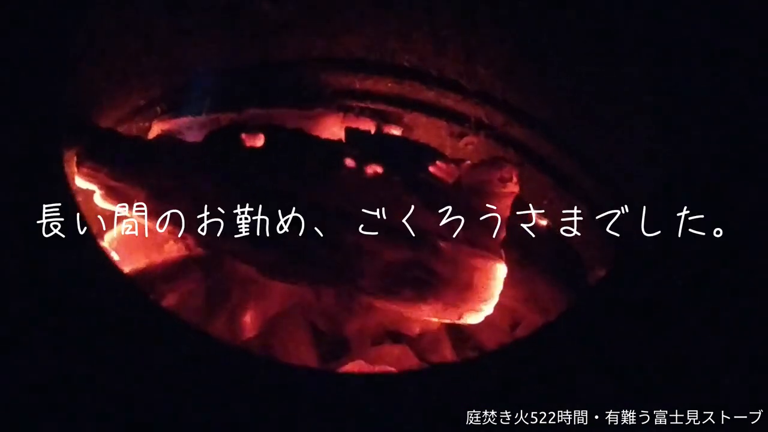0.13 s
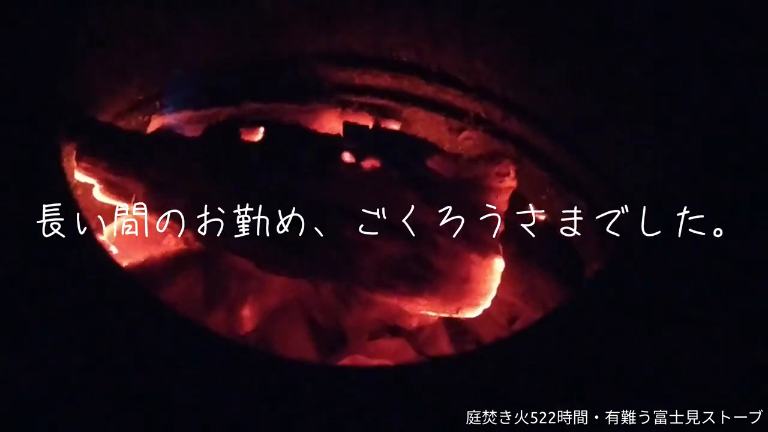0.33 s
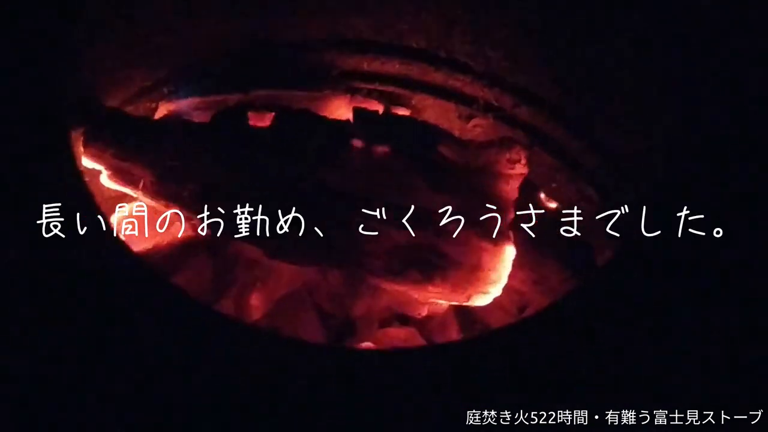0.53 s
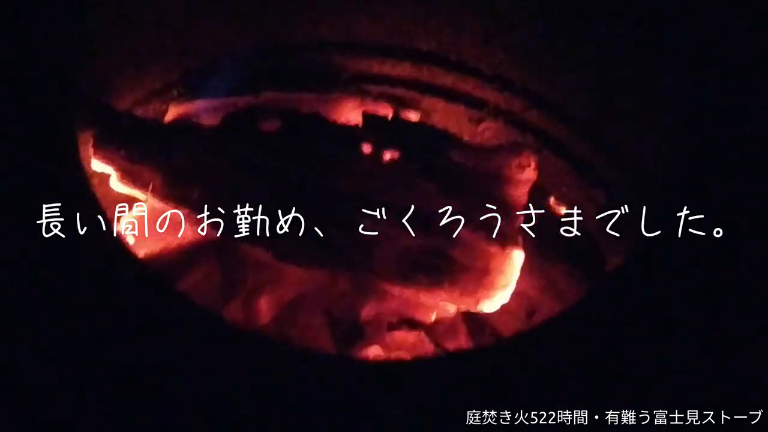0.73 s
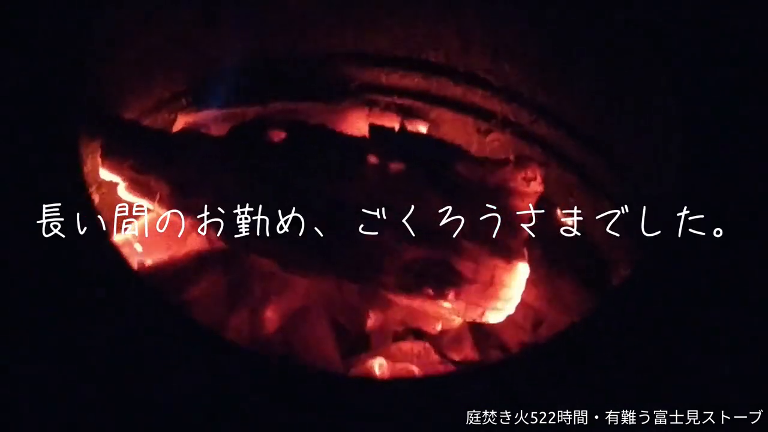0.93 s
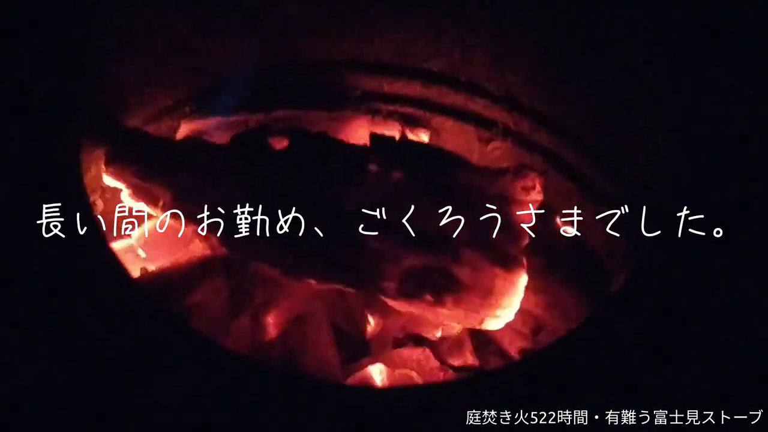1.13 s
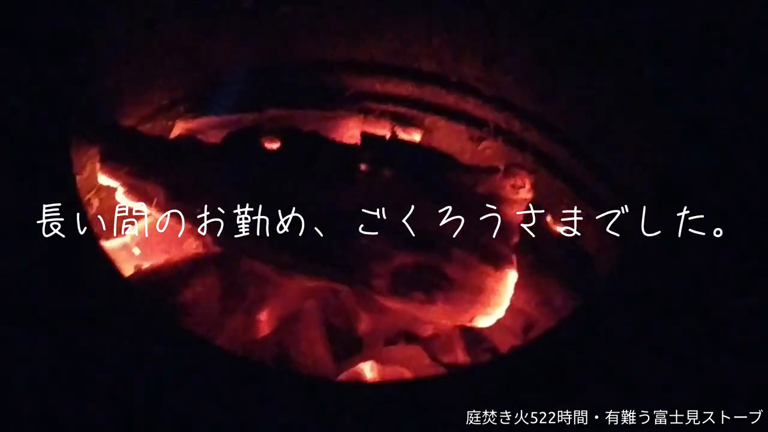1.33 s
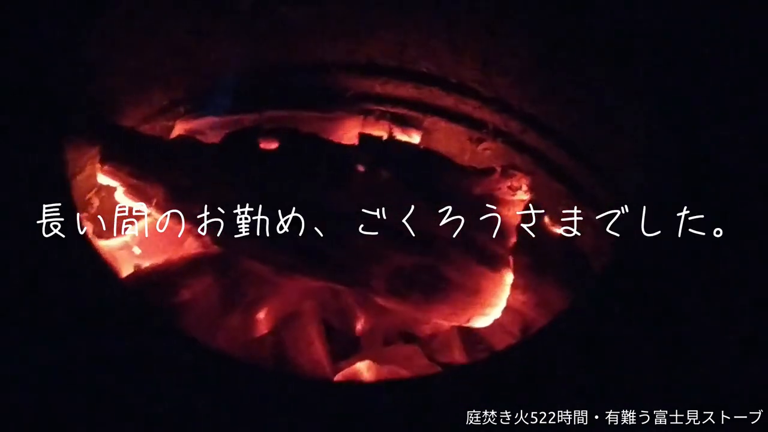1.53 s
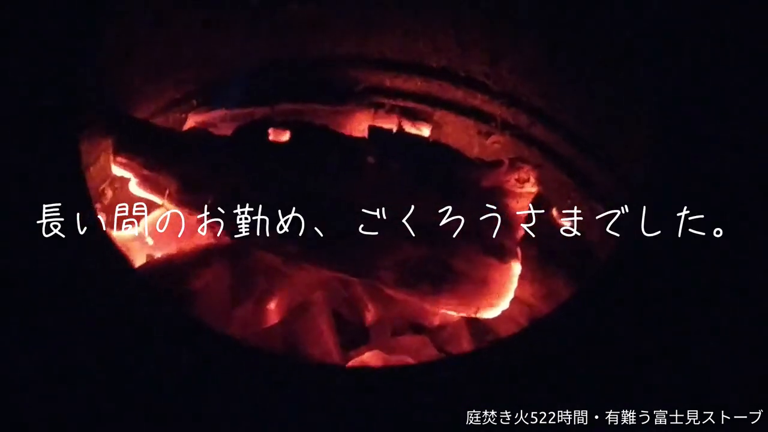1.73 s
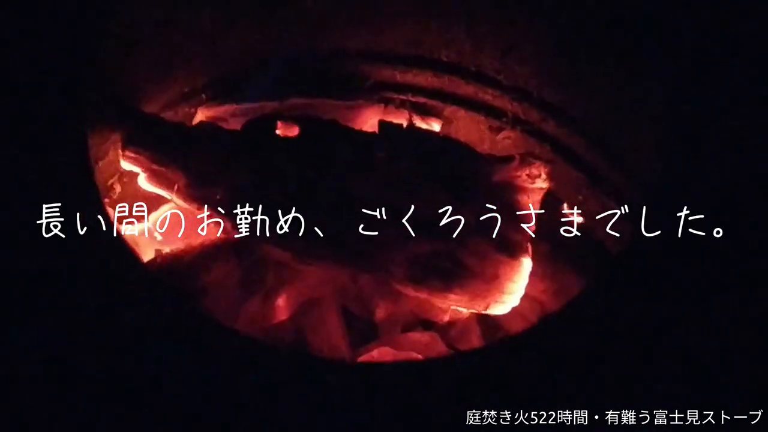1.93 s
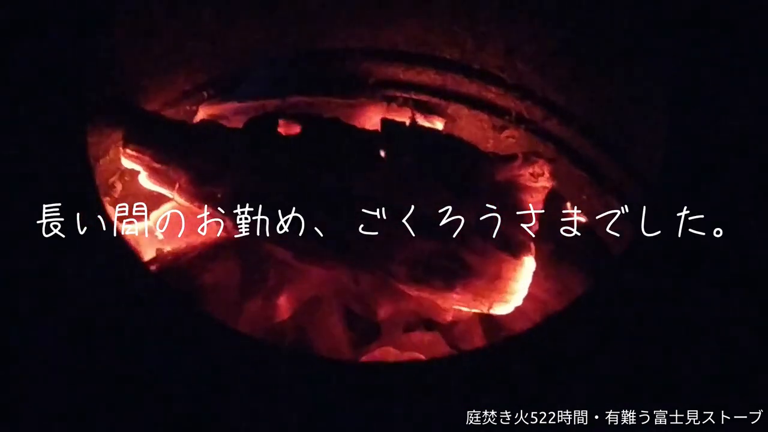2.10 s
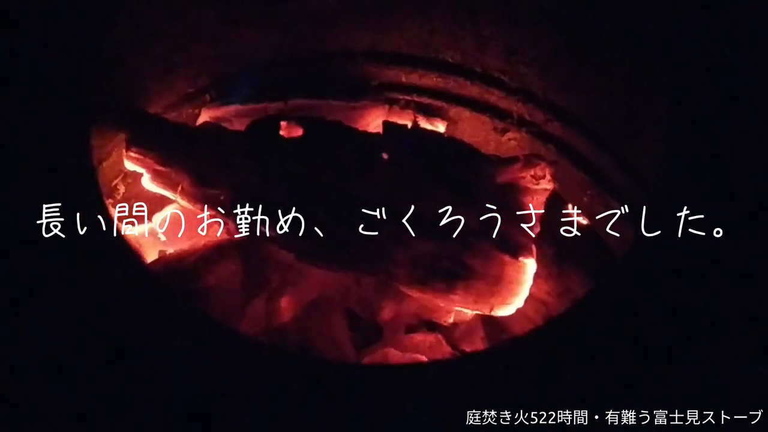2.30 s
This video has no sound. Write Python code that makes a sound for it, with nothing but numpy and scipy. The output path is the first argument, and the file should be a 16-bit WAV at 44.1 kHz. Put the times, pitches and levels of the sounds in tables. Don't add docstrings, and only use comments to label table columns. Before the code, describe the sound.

Wood stove embers tick and snap on the right of a small stereo microphone; early thin metal rattles and knocks a plate near the centre, a hard crack follows, then quiet scattered clicks over soft hiss and droning draught.

```python
import sys
import numpy as np
from scipy import signal
from scipy.fft import rfft, irfft, next_fast_len
from scipy.io import wavfile
from scipy.ndimage import uniform_filter1d, map_coordinates

SR = 44100
rng = np.random.default_rng(int(sys.argv[2]) if len(sys.argv) > 2 else 0)


def voltage_ratio(level):
    return 10 ** (np.asarray(level, float) / 20)


def log_audio(samples):
    frames = np.atleast_2d(samples).T
    limited = np.clip(frames, -1, 1)
    pcm = np.round(limited * 32767).astype(np.int16)
    wavfile.write(sys.argv[1], SR, pcm)


N = 104120

# (time [s], level [dB])
DRAUGHT_LEVEL = [(0.0, -52.5), (0.06, -51.5), (2.36, -53)]
# (frequency [Hz], density [dB per Hz])
RUMBLE_COLOUR = [(15, -55), (24, -2), (45, -3), (100, -7.5), (200, -9), (300, -18.5), (450, -26),
                 (700, -97)]
# (frequency [Hz], width [Hz], boost [dB])
FLUE_MODES = [(116.9, 18.6, 5.5), (160.6, 6.9, 6), (267.8, 29, 5.5)]
# (frequency [Hz], density [dB per Hz])
AIR_COLOUR = [(250, -38.5), (480, -2.5), (680, -6.5), (1200, -5.5), (1600, -14), (2350, -11), (3300, -29.5),
              (5000, -70)]
# (frequency [Hz], density [dB per Hz])
HISS_COLOUR = [(1650, -8.5), (2800, -8), (3770, -8), (6380, -6), (9000, -6), (13500, -8), (14250, -7),
               (14420, -67)]
# (time [s], level [dB])
HISS_LEVEL = [(0, -61.5), (.45, -61.5), (.55, -70), (1.2, -67.5), (2.36, -70.5)]
# (frequency [Hz], likeness [0 to 1])
EAR_LIKENESS = [(60, 0.94), (130, 0.95), (290, 0.76), (640, 0.34), (2200, 0.32), (6760, 0.27), (14000, 0.9)]
# (frequency [Hz], left over right [dB])
BACKGROUND_BALANCE = [(60, -2.0), (130, -3.0), (290, -2), (640, -1), (1400, -5), (3080, -11), (6760, -7.5),
                      (14800, 10)]

# (time [s],
# level [dB], split lasts [s], pitch of the coal [Hz], brightness [dB per octave])
CRACKS = [(.0004, -36.5, 0.0032, 6460, 3.5), (0.0325, -35.5, 0.0014, 6180, 9),
          (0.4129, -14, 0.00013, 6320, -1), (0.599, -47, 0.0012, 2690, -0.5),
          (0.639, -55, 0.0012, 11950, 9), (0.692, -59, 0.00137, 11800, 6), (0.7461, -41, .003, 2410, -5),
          (0.87, -56, 0.003, 6700, 0.5), (0.9247, -49, 0.0048, 7010, 1), (0.956, -61, 0.0016, 6050, -2),
          (1.0977, -33.5, 0.0027, 7560, 1.5), (1.1021, -34.5, 0.002, 7000, -1),
          (1.32, -52.5, 0.0056, 6630, 5), (1.348, -56, 0.0018, 6500, 6), (1.606, -63, 0.009, 6530, 0),
          (1.953, -49.5, 0.0026, 6600, 7), (2.1346, -54.5, 0.0015, 8000, 19),
          (2.161, -58.5, 0.0092, 6830, 2), (2.3524, -59.5, 0.002, 6500, 23),
          (0.6297, -64, .002, 5870, -6), (0.6756, -62, .002, 6020, 2), (.818, -66, 0.0017, 4370, -8),
                (1.04, -62, .002, 9610, -2), (1.1986, -63.5, .002, 7500, 6), (1.2814, -60, .002, 7000, 4),
                (1.292, -62, .003, 6400, 4), (1.472, -65, .002, 6150, 2), (1.829, -63, .002, 6800, 2),
                (1.842, -59, .002, 13000, 10), (1.991, -58, .001, 10300, 10), (2.0316, -62, .002, 6580, 5),
                (2.141, -62, 0.0022, 13400, 17), (2.228, -63, 0.0022, 6500, 4), (2.337, -73, .002, 4440, 2),
                (0.7459, -42, .002, 13900, 4), (.9245, -50, .002, 11500, 24),
                (.5995, -54, 0.0046, 2950, -16), (1.9545, -61, .001, 6600, 4)]
# (frequency [Hz], level [dB], t60 [s])
FIREBOX_MODES = [(2850, -4.5, 0.019), (3219, -22, .012), (4000, -10, 0.016), (4536, -6, 0.017),
                 (5420, -4, .016), (6156, 3.5, 0.0058), (6890, -6, 0.011), (7813, -8, 0.011),
                 (10620, -17.5, .016), (11500, -17, .01)]
# (frequency [Hz], density [dB per Hz])
SNAP_COLOUR = [(900, -35), (1600, -29), (2400, -7.5), (3500, -14.5), (6100, -8), (10000, -14.5),
               (13000, -6), (16000, -1)]
# (frequency [Hz], left over right [dB])
FIRE_BALANCE = [(900, -18), (2400, -17), (4000, -24), (6000, -13.5), (9000, -19.5), (14000, 4)]

# (time [s], level [dB], pitch struck most [Hz], left over right [dB])
JINGLES = [(.079, -41.5, 2400, -17), (0.0807, -31, 12000, 4.5), (.088, -42.5, 4200, -9),
           (0.1235, -43.5, 8400, 5), (0.167, -52, 3262, -3), (.172, -43, 9860, 7), (0.187, -40.5, 8400, 1),
           (.2114, -31, 6400, -5), (0.2114, -48, 2400, -14), (.2125, -37, 5150, -6), (0.2443, -36, 9275, 7),
           (.2475, -34.5, 12030, 14), (0.2481, -25.5, 2570, -12), (.2478, -22, 6650, -1),
           (0.2517, -27.5, 4050, -7.5), (.2555, -34, 9275, 0), (.2558, -42, 6650, -2),
           (.2615, -31, 6650, -4), (.262, -44, 9275, -4), (.283, -50, 8960, 2), (.291, -44, 9275, 0),
           (.3155, -32, 3560, -6), (.3255, -35, 6650, -6), (.339, -31, 8420, -10),
           (0.3106, -40.5, 2300, -13), (0.3233, -28.5, 8160, 6), (0.334, -33, 6650, -10),
           (0.349, -29.5, 10890, 15), (0.3497, -29.5, 5150, -3), (0.3594, -62, 4000, 0)]
# (frequency [Hz], level [dB], t60 [s], left over right [dB])
SCRAP_MODES = [(2568, -3, .04, -5), (3262, -12, .16, 5), (4048, -7, .14, -12), (4307, -7, .09, -8),
               (5152, -2, .08, -4), (6648, -6, .05, -4), (8420, -6, .08, 0), (8960, -6, .1, 0),
               (9275, 0, .11, 0), (9860, -6, .08, 6), (10890, -3, .09, 6), (11510, -9, .08, 4),
               (12030, -3, .06, 4), (13590, -16, .06, 2)]
# (frequency [Hz], density [dB per Hz])
SCRAPE_COLOUR = [(700, -11), (1500, -13), (2400, -3), (4000, -4.5), (9000, -2), (12500, -7.5), (14200, -14),
                 (16000, -30)]
# (time [s], level [dB])
SHAKING_LEVEL = [
    (.07, -99.5),
    (.09, -76),
    (.16, -69),
    (.2, -62.5),
    (.243, -58.5),
    (.25, -50),
    (.305, -54),
    (.35, -49),
    (.385, -54),
]
# (frequency [Hz], level [dB], t60 [s])
PLATE_MODES = [(866, -6, 0.15), (1190, -4.5, 0.055), (1830, -1.5, 0.026), (2260, 2, 0.18), (2830, 3, .06)]
# (time [s], level [dB])
KNOCKS = [
    (.079, -61),
    (.2114, -54.5),
    (.2475, -53),
    (.268, -49.5),
    (.3125, -59),
    (.332, -54.5),
]

# (frequency [Hz], gain [dB])
TOP_ROLLOFF = [(14300, -0.5), (15000, -47), (16400, -51.5)]
# (from [s], to [s])
WIDE_TREBLE = [(.58, .61), (.77, .86), (1.33, 1.36), (1.43, 1.455), (1.91, 2.05), (2.12, 2.19), (2.33, 2.4)]

FIRE_LEFT_LAG_S, BACKGROUND_LEFT_LEAD_S = 0.000356, .00038
AIR_DB = -64
DRONE_HZ, DRONE_DB = 32, -57
SNAP_T60_S, TAIL_DB, TAIL_T60_S = 0.0084, -23, 0.091
FIREBOX_DB, COAL_DB, COAL_T60_S = -7, -6, 0.0093
ECHO_S, ECHO_DB, LOW_CUT_HZ = .0032, -9, 1540
TICKS_PER_S, TICK_DB, TICK_SPREAD_DB = 33, -75.5, 9.5
TICK_HZ, TICK_WIDTH_HZ, TICK_PEAK_DB = 6500, 960, 19.5
SCRAP_RING_DB, SCRAPE_DB, SCRAPE_T60_S = -8, -7.5, 0.028
FOCUS_DB = 19.5
RATTLE_WIDTH_HZ, RATTLE_SPREAD_DB, MAIN_MODES_DB = 27.4, 17, 10
RATTLE_TILT_DB, GRIT_DB = 20, 3
RESTS_S, REST_T60_S, TUMBLE_DB = .376, .08, 4
GATE_HZ, GATE_DB = 14450, -85
MONO_HZ, MONO_DRIFT_HZ, MONO_UNDER_DB = 8500, 700, -83
FOLD_ABOVE = .9
BUSY_TILL_S, HOLES_BUSY, HOLES_CALM, HOLE_FROM_HZ = .46, .3, .06, 2800


def unit(x):
    return x / np.sqrt(np.mean(x ** 2) + 1e-20)


def along(points, hz):
    f, v = np.transpose(points)
    return np.interp(np.log(hz + 1), np.log(f + 1), v)


def curve(rows):
    s, v = np.transpose(rows)
    return np.interp(np.arange(N) / SR, s, v)


def wobble(rate):
    knots = rng.standard_normal(int(N * rate / SR) + 4)
    return map_coordinates(knots, [np.arange(N) * rate / SR])


def filtered(x, response):
    n = x.shape[-1]
    m = next_fast_len(n + 4096)
    return irfft(rfft(x, m) * response(np.fft.rfftfreq(m, 1 / SR)), m)[..., :n]


def ears(balance, lag_s=0):
    turn = np.array([[1], [-1]])
    return lambda hz: voltage_ratio(turn * along(balance, hz) / 2) * np.exp(-1j * np.pi * turn * hz * lag_s)


def patchy(x, size, spans, depth_db, offset_db=0):
    z = signal.stft(x, nperseg=size)[2]
    field = rng.standard_normal(z.shape[1:])
    field = uniform_filter1d(uniform_filter1d(field, spans[0], 0), spans[1], 1)
    return signal.istft(z * voltage_ratio(depth_db * unit(field) + offset_db), nperseg=size)[1][:, :N]


def rush(gain, patchy_db, lag_s=0):
    pair = patchy(rng.standard_normal((2, N)), 512, (6, 14), patchy_db)
    turn = lambda hz: np.arccos(np.clip(along(EAR_LIKENESS, hz), -1, 1)) / 2
    mid, side = filtered(pair, lambda hz: gain(hz) * [np.cos(turn(hz)), np.sin(turn(hz))])
    both = filtered(np.array([mid + side, mid - side]), ears(BACKGROUND_BALANCE, lag_s))
    return both / np.std(both.mean(0))


def ringing(hz, db, t60, t, scatter_db, pan_db=0):
    luck = rng.standard_normal((2, len(hz), 1))
    fade = db + scatter_db * luck[0] - 60 * t / t60
    sides = []
    for ear in (.5, -.5):
        phase = (ear + .5) * 3.2 * luck[1]
        sides.append((voltage_ratio(fade + ear * pan_db) * np.sin(2 * np.pi * hz * t + phase)).sum(0))
    return np.array(sides)


def puff(gain, t, alike):
    a, b = rng.standard_normal((2, len(t)))
    share = np.clip(alike, 0, 1)
    return unit(filtered(np.array([share * a + np.sqrt(1 - share ** 2) * b, a]), gain))


def add(out, s, sound):
    out[:, max(round(s * SR), 0):][:, :sound.shape[1]] += sound


def night():
    def pipe(hz):
        modes = sum(db / (1 + ((hz - centre) / width * 2) ** 2) for centre, width, db in FLUE_MODES)
        return voltage_ratio(along(RUMBLE_COLOUR, hz) + modes)

    lead = BACKGROUND_LEFT_LEAD_S
    rumble = voltage_ratio(curve(DRAUGHT_LEVEL) + 1.2 * wobble(3.03)) * rush(pipe, patchy_db=0.33, lag_s=-lead / 2)
    drone_level = voltage_ratio(DRONE_DB + 1.1 * wobble(1.9)) * np.sqrt(2)
    drone = drone_level * np.sin(np.cumsum(2 * np.pi * DRONE_HZ / SR * (1 + 0.0666 * wobble(3.06))))
    air = voltage_ratio(AIR_DB + 0.1 * wobble(4.26))
    air = air * rush(lambda hz: voltage_ratio(along(AIR_COLOUR, hz)), patchy_db=0.45, lag_s=-lead)
    hiss = voltage_ratio(curve(HISS_LEVEL) + 0.45 * wobble(7.33))
    hiss = hiss * rush(lambda hz: voltage_ratio(along(HISS_COLOUR, hz)), patchy_db=1.5)
    return rumble + filtered(drone, ears(BACKGROUND_BALANCE, -lead)) + air + hiss


def cracks():
    out, t = np.zeros((2, N + SR)), np.arange(SR // 6) / SR
    hz, level, t60 = np.transpose(FIREBOX_MODES)[:, :, None]
    for s, db, lasts, coal_hz, tilt_db in CRACKS:
        after = np.maximum(t - lasts, 0)
        colour = lambda f: voltage_ratio(along(SNAP_COLOUR, f) + tilt_db * np.log2((f + 300) / 6000))
        burst = puff(colour, t, alike=0.2)
        hit = burst * (voltage_ratio(-60 * after / SNAP_T60_S) + voltage_ratio(TAIL_DB - 60 * t / TAIL_T60_S))
        box_db = level + tilt_db * np.log2(hz / 6000)
        hit += voltage_ratio(FIREBOX_DB) * ringing(hz, box_db, t60 + lasts, t, scatter_db=1.5)
        hit += voltage_ratio(COAL_DB - 60 * after / COAL_T60_S) * np.sin(2 * np.pi * coal_hz * t)
        hit *= np.minimum(t / 0.00021, 1)
        add(out, s, voltage_ratio(db) * hit)
        add(out, s + ECHO_S, voltage_ratio(db + ECHO_DB) * hit * np.sign(rng.standard_normal()))
    low_cut = lambda f: (1j * f / LOW_CUT_HZ / (1 + 1j * f / LOW_CUT_HZ)) ** 3
    return filtered(filtered(out[:, :N], low_cut), ears(FIRE_BALANCE, FIRE_LEFT_LAG_S))


def ticks():
    when, size = rng.random((200, 2))[:int(TICKS_PER_S * N / SR)].T
    blows = np.bincount((when * N).astype(int), voltage_ratio(TICK_DB + TICK_SPREAD_DB * size), N)
    shape = np.convolve(blows, voltage_ratio(-60 * np.arange(SR // 30) / SR / 0.011))[:N]

    def colour(f):
        peak = TICK_PEAK_DB / (1 + ((f - TICK_HZ) / TICK_WIDTH_HZ * 2) ** 2)
        return voltage_ratio(along(SNAP_COLOUR, f) + peak)

    return filtered(shape * puff(colour, shape, alike=0.42), ears(FIRE_BALANCE, FIRE_LEFT_LAG_S))


def scrap():
    out, t = np.zeros((2, N + SR)), np.arange(SR // 4) / SR
    hz, level, t60, side_db = np.transpose(SCRAP_MODES)[:, :, None]
    for s, db, struck_hz, pan_db in JINGLES:
        near = lambda f: -FOCUS_DB * abs(np.log2((f + 1) / struck_hz))
        ring = ringing(hz, level + 2 * near(hz), t60, t, scatter_db=1.0, pan_db=side_db)
        rub = puff(lambda f: voltage_ratio(along(SCRAPE_COLOUR, f) + near(f)), t, alike=0.45)
        slip = voltage_ratio(SCRAP_RING_DB) * ring + voltage_ratio(SCRAPE_DB - 60 * t / SCRAPE_T60_S) * rub
        pan = np.array([[.5], [-.5]]) * pan_db
        add(out, s, voltage_ratio(db + pan) * slip * np.minimum(t / .001, 1))
    return out[:, :N]


def rattle(count=64):
    place, size, left = rng.random((count, 3)).T[:, :, None]
    main_hz, main_db, _, main_pan_db = np.transpose(SCRAP_MODES[1:])[:, :, None]
    small_hz = 3450 + 10500 * (np.arange(count)[:, None] + place) / count
    small_db = RATTLE_SPREAD_DB * (size - .5) + along(SCRAPE_COLOUR, small_hz) + 8.0
    small_pan_db = RATTLE_TILT_DB * np.log2(small_hz / 8000) + 12 * (left - .5)
    hz, n = np.vstack([small_hz, main_hz]), SR // 2
    level = np.vstack([small_db, main_db + MAIN_MODES_DB])
    pan_db = np.vstack([small_pan_db, main_pan_db])
    turn = rng.standard_normal(hz.shape)
    push = (voltage_ratio(curve(SHAKING_LEVEL) + GRIT_DB * wobble(252.3)) * rng.standard_normal(N))[:n]

    def modes(f, ear):
        resonance = 1j * f * RATTLE_WIDTH_HZ / (hz ** 2 - f ** 2 + 1j * f * RATTLE_WIDTH_HZ)
        return (voltage_ratio(level + ear * pan_db) * np.exp(1j * ear * turn) * resonance).sum(0)

    sides = [filtered(push, lambda f: 2 * modes(f, ear)) for ear in (.5, -.5)]
    return np.pad(sides, ((0, 0), (0, N - n)))


def tumbling(x):
    flicker = patchy(x, 256, (3, 8), TUMBLE_DB, offset_db=-2.5)
    return flicker * voltage_ratio(-60 * np.maximum(np.arange(N) / SR - RESTS_S, 0) / REST_T60_S)


def plate():
    out, t = np.zeros((2, N + SR)), np.arange(SR // 4) / SR
    hz, level, t60 = np.transpose(PLATE_MODES)[:, :, None]
    for s, db in KNOCKS:
        knock = ringing(hz, level, t60, t, scatter_db=3.5, pan_db=-8)
        add(out, s, voltage_ratio(db) * knock * np.minimum(t / 0.00089, 1))
    return out[:, :N]


def scene():
    return night() + cracks() + ticks() + tumbling(scrap() + rattle()) + plate()


def blocks(grid, high, wide, shape):
    return grid.repeat(high, 0).repeat(wide, 1)[:shape[0], :shape[1]]


def narrowed(x):
    hz, t, z = signal.stft(x, SR, nperseg=256)
    top = hz > GATE_HZ
    loud = np.abs(z[:, top][:, :4]).mean((0, 1)) > voltage_ratio(GATE_DB)
    treble = (hz > MONO_HZ) & ~top
    quiet = uniform_filter1d(np.abs(z[:, treble]).mean((0, 1)), size=4) < voltage_ratio(MONO_UNDER_DB)
    quiet &= ~np.any([(t > a) & (t < b) for a, b in WIDE_TREBLE], 0)
    drift = np.clip(rng.standard_normal(len(t) // 8 + 1), -1, 4).repeat(8)[:len(t)]
    edge_hz = MONO_HZ + MONO_DRIFT_HZ * drift
    patches = blocks(rng.standard_normal((33, len(t) // 8 + 1)), 4, 8, (len(hz), len(t))) > FOLD_ABOVE
    folds = (hz[:, None] > edge_hz) & quiet | patches & treble[:, None]
    z = np.where(folds, z.mean(0), z)
    return signal.istft(z * (~top[:, None] | loud), SR, nperseg=256)[1][:, :N]


def starved(x):
    hz, t, z = signal.stft(x, SR, nperseg=1024)
    level = uniform_filter1d(np.abs(z).mean(0), size=6, axis=0)
    treble = (hz > HOLE_FROM_HZ) & (hz < GATE_HZ)
    weak = level < np.median(level[treble], 0)
    luck = blocks(rng.random((129, len(t) // 3 + 1)), 4, 3, (len(hz), len(t)))
    holes = treble[:, None] & weak & (luck < np.where(t < BUSY_TILL_S, HOLES_BUSY, HOLES_CALM))
    return signal.istft(z * ~holes, SR, nperseg=1024)[1][:, :N]


def top_cut(x):
    return signal.sosfilt(signal.butter(12, 16400, fs=SR, output="sos"), x)


def record(dry):
    rolled_off = filtered(dry, lambda f: voltage_ratio(along(TOP_ROLLOFF, f)))
    finished = starved(narrowed(rolled_off))
    return top_cut(finished)


dry = scene()
out = record(dry)
log_audio(out)
```